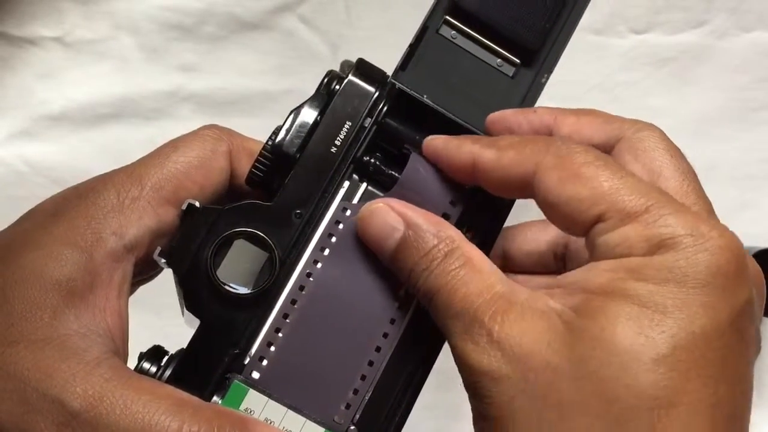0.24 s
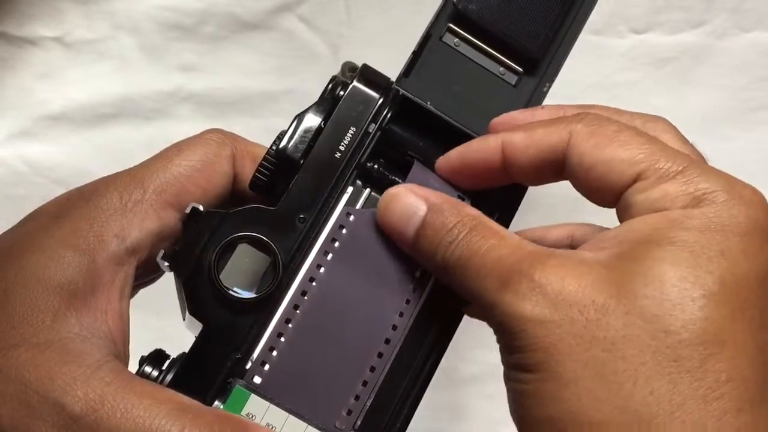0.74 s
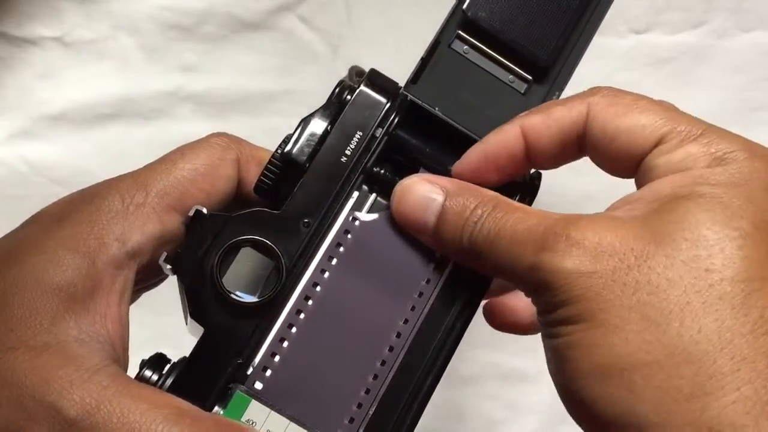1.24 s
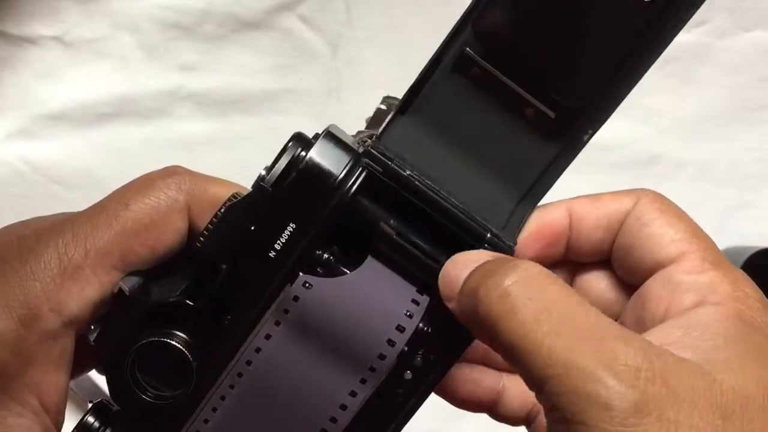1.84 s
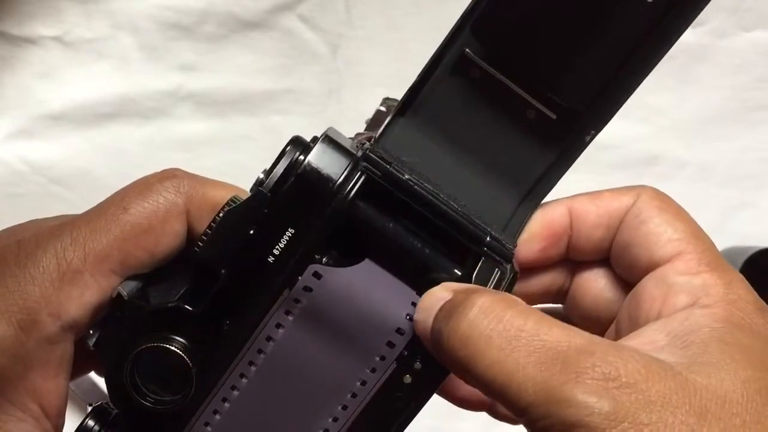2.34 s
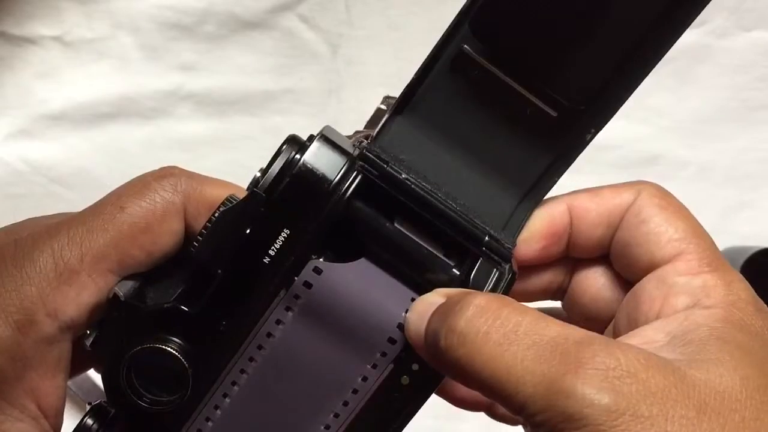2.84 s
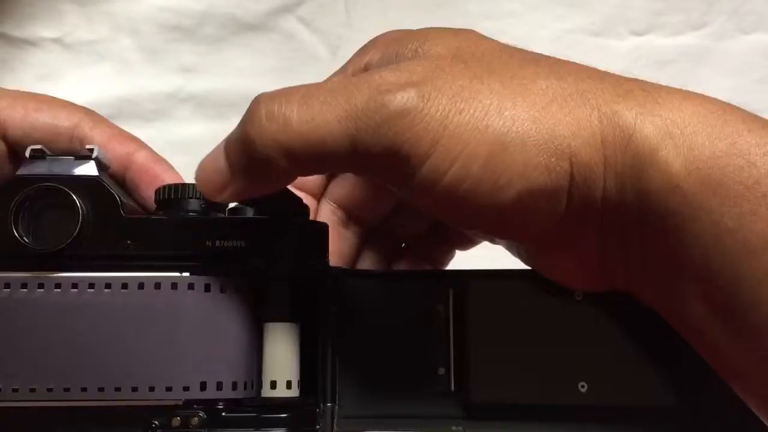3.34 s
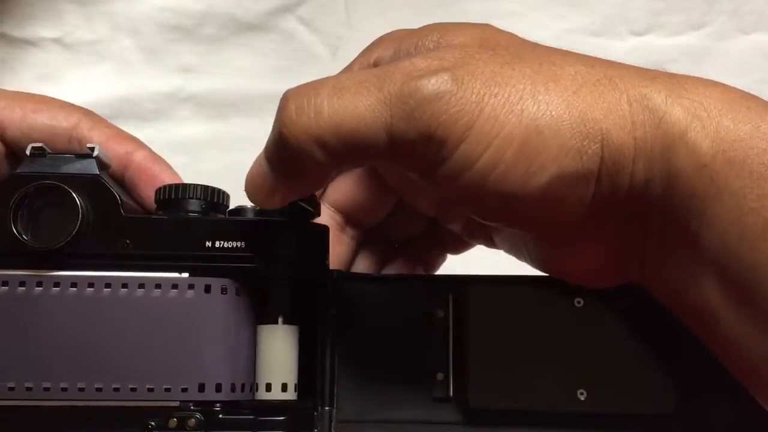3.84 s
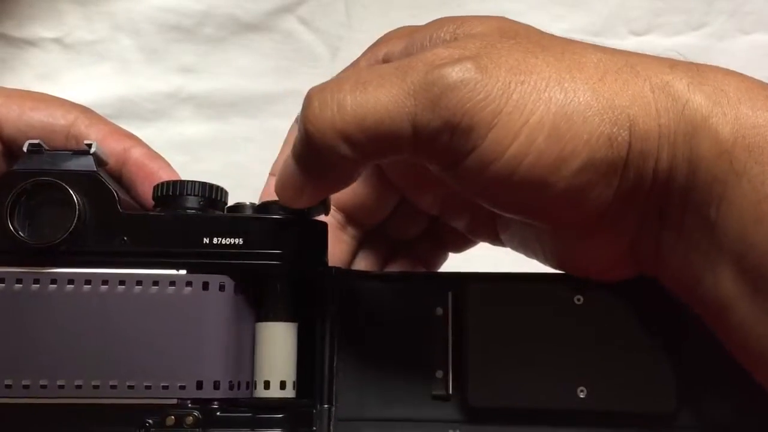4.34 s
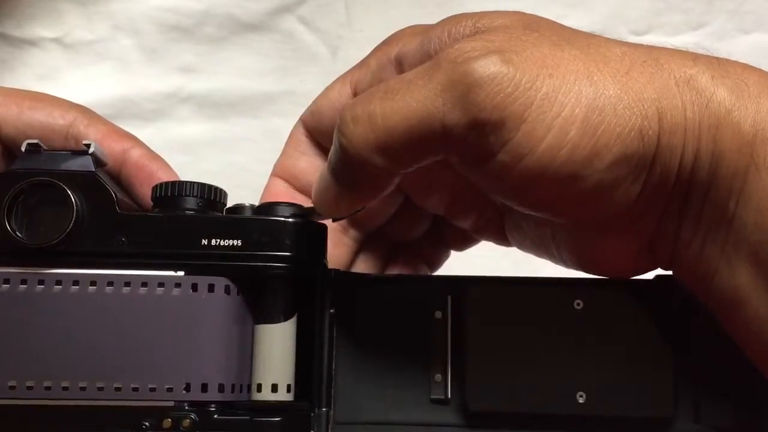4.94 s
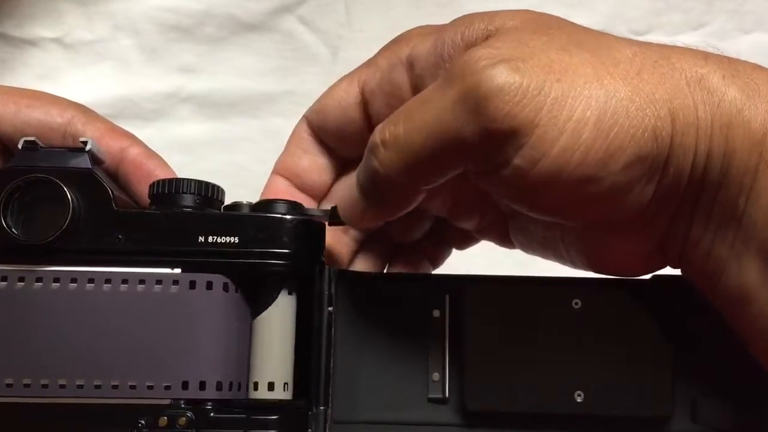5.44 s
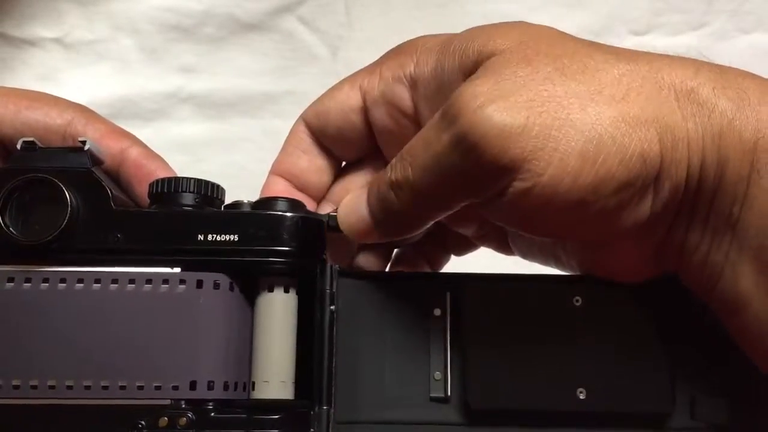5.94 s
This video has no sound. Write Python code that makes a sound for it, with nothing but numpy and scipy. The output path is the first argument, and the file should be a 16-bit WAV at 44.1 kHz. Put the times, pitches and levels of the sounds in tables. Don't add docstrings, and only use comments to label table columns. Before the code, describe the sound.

A faint low motor hum lies under a quiet indoor room. Fingers handle film with small plasticky snaps, a sharper snap and dull thuds early on, then a slight squeak. The sound cuts briefly twice. Between cuts, only a few light ticks; after the second, a loud double shutter crack, hard lever catches and increasingly crowded ratchet clicking with loose rattles, very close and dry, until it stops.

```python
import sys
import numpy as np
from scipy import signal
from scipy.fft import rfft, irfft
from scipy.io import wavfile
from scipy.ndimage import uniform_filter1d

SR = 44100
rng = np.random.default_rng(int(sys.argv[2]) if len(sys.argv) > 2 else 0)


def inscribe(sig):
    pcm = np.round(np.clip(np.atleast_2d(sig).T, -1, 1) * 32767)
    wavfile.write(sys.argv[1], SR, pcm.astype(np.int16))


def field_ratio(decibels):
    return 10 ** (np.asarray(decibels, dtype=float) / 20)


N = 273420
TIME_S = np.arange(N) / SR
FFT_HZ = np.arange(N // 2 + 1) * SR / N

# freq_hz, density_db
ROOM_SPECTRUM = [(120, -61.5), (200, -6.5), (279, -15.5), (343, 0), (398, -20), (735, -24.5), (1030, -22.5),
                 (14900, -37.5), (17000, -59.5)]
ROOM_DB = -66.5
# time_s, level_db
MOTOR_WHINE = [
    (0, -61),
    (.64, -61),
    (1.9, -62),
    (3, -62.5),
    (3.9, -58),
    (6.2, -58.5),
]
# multiple, level_db
MOTOR_ORDERS = [(3, -8), (4, -13), (5, -17.5), (7, -1), (8, -21), (9, -17.5), (11, -21.5), (12, -27)]
MOTOR_HZ = 49.3
# crest_s, level_db, fall_s
THROBS = [
    (.25, -60.5, 0.087),
    (.64, -65, 0.22),
    (1.38, -61, 0.26),
    (2.62, -56, 0.39),
    (3.3, -67.5, 0.46),
    (4.2, -64, .3),
    (4.65, -58.5, 0.54),
    (5.7, -66, .5),
]
THROB_REST_DB, THROB_RISE_S = -73, 0.12

# time_s, level_db
HAND_RUB = [(0, -74), (.2, -67), (.52, -92.5), (.6, -55), (.75, -71.5), (1, -73), (1.3, -75.5),
            (1.9, -81.5), (2.23, -67), (2.5, -82), (3.4, -88), (3.5, -72.5), (4.3, -67), (4.66, -67.5),
            (4.89, -56), (5.04, -67), (5.75, -52), (6.2, -75)]
# freq_hz, density_db
RUB_SPECTRUM = [(700, -12.5), (1600, -3), (3000, 0), (4500, -3.5), (5500, -7.5), (8000, -9), (12000, -9),
                (16000, -11.5)]
# freq_hz, density_db
HOLLOW_SPECTRUM = [(350, 2), (700, -1), (1400, -7.5), (2200, -8.5)]
# freq_hz, density_db
RUMBLE_SPECTRUM = [(45, -25), (70, 2), (110, -2.5), (155, 6), (200, -5), (300, -5.5), (500, -14)]
# crest_s, rumble_db
GRIPS = [(0, -72), (.6, -52), (.7, -56), (1.23, -68), (2.57, -58), (3.5, -64), (4.68, -56), (4.89, -65),
         (5.25, -56.5), (5.68, -69), (6.08, -63)]
GRIP_REST_DB, GRIP_RISE_S, GRIP_FALL_S = -63.5, 0.03, 0.05

# start_s, pitch_hz, peak_db
KNOCKS = [(.147, 890, -40.5), (0.584, 1000, -39), (.927, 1730, -39), (1.005, 1680, -36.5),
          (1.043, 788, -32.5), (1.093, 844, -45), (3.483, 1620, -47), (3.648, 1450, -36), (4.3, 1620, -60),
          (3.957, 548, -44.5), (4.472, 850, -47), (4.579, 720, -41.5), (2.654, 720, -52.5),
          (4.5795, 1290, -31), (4.800, 665, -43.5), (4.853, 965, -38), (5.157, 586, -48.5),
          (5.183, 470, -44.5), (5.248, 650, -54), (5.276, 730, -56), (5.308, 534, -50), (5.431, 760, -46.5),
          (5.492, 626, -48), (5.610, 622, -38.5), (5.625, 520, -43), (5.612, 1250, -40), (5.672, 720, -45),
          (5.758, 814, -35), (5.795, 533, -47), (5.861, 790, -35), (6.090, 840, -53.5)]
# start_s, pitch_hz, peak_db
THUDS = [
    (0.553, 79.4, -38.5),
    (.585, 76, -40),
    (.6, 240, -37),
    (0.635, 97.5, -36.5),
    (0.809, 123, -45),
    (1.213, 77, -42),
    (3.481, 132, -40.5),
]
# centre_s, length_s, pitch_hz, level_db
SQUEAKS = [
    (1.44, 0.097, 820, -59.5),
    (1.189, 0.041, 1200, -68),
    (1.24, 0.066, 1320, -67),
    (1.272, 0.06, 1800, -67),
    (2.253, 0.079, 1180, -62),
]
# centre_s, length_s, pitch_hz, level_db
CHAFES = [(.17, .035, 1750, -65), (.18, .06, 2500, -68), (.65, 0.13, 2005, -63), (.84, .04, 1630, -74),
          (.88, .05, 1870, -67), (.905, .04, 1750, -67), (.9, .06, 2500, -70), (1.02, 0.054, 1700, -54),
          (1.07, 0.05, 844, -63), (1.08, .03, 1950, -65), (1.23, 0.13, 536, -65.5), (4.5, .06, 1450, -61.5),
          (4.51, 0.077, 4150, -57), (4.62, 0.13, 3200, -52), (4.63, .08, 6000, -56.5),
          (4.9, .06, 5700, -53), (5.1, .04, 4200, -58), (5.29, 0.035, 4180, -59), (4.208, .035, 3500, -56),
          (1.53, .06, 3800, -71)]
SQUEAK_WIDTH, CHAFE_WIDTH = 0.045, 0.16

# crest_s, rise_s, fall_s, level_db
SCRAPES = [(.148, 0.002, 0.0066, -40.5), (0.5835, 0.00088, 0.0018, -25.5), (1.025, 0.014, 0.0071, -57),
           (1.041, 0.0054, 0.0041, -36), (2.015, 0.0046, 0.0052, -61.5), (2.207, 0.0044, 0.022, -50),
           (2.359, 0.0011, 0.034, -50), (2.581, .001, 0.026, -53.5), (2.65, .001, 0.0045, -43),
           (5.753, .001, 0.012, -35), (5.858, 0.0019, 0.006, -31)]
# freq_hz, density_db
SCRAPE_SPECTRUM = [(900, -7.5), (2000, 0.5), (6000, -0.5), (8000, -7), (10000, 0), (16000, -6.5)]

# freq_hz, width_hz, level_db
PLATE_MODES = [(2140, 91, -7.5), (2957, 110, 6), (3200, 80, 3), (3560, 170, 5), (5850, 1300, 1),
               (7300, 150, -7)]
# freq_hz, width_hz, level_db
SHUTTER_MODES = [(2880, 300, 8), (3600, 440, 0), (5400, 570, 7)]
SHUTTER_S, SHUTTER_T60_S, SHUTTER_DB = 3.957, 0.36, -43
# freq_hz, density_db
TAIL_SPECTRUM = [(700, -17.5), (1600, -3), (3000, 1), (4200, 0.5), (5000, -10.5), (8000, -11), (12000, -12),
                 (16000, -15)]
TAIL_T60_S, TAIL_DB = 0.19, -38.5
PLATE_T60_S, PLATE_DB = 0.43, -42

# start_s, peak_db, pitch_hz, t60_s
PINGS = [
    (0.5851, -30.5, 1780, 0.025),
    (3.8819, -31, 1690, 0.018),
    (3.9232, -37, 1590, 0.026),
    (4.4716, -25, 1540, 0.011),
    (5.0843, -52, 1620, 0.03),
    (5.277, -44, 1600, 0.033),
    (5.3058, -51, 1900, 0.03),
    (5.6633, -35, 1520, 0.028),
    (5.76, -33, 1590, 0.022),
    (5.866, -30, 1730, 0.026),
         (0.0014, -47, 2520, 0.02), (0.1461, -41, 2430, 0.022), (0.5814, -30, 2670, 0.018),
             (3.8806, -32, 2440, 0.022), (3.9215, -24, 2460, 0.024), (4.371, -40, 2050, 0.022),
             (4.577, -23, 2780, 0.018), (4.7964, -35, 2350, 0.022), (4.803, -37, 2460, 0.026),
             (4.8458, -27, 2080, 0.022), (4.8523, -20.5, 2480, 0.021), (4.9541, -35.5, 2380, 0.031),
             (4.9801, -44, 2530, 0.022), (5.0744, -53, 2630, 0.022), (5.1228, -53, 2180, 0.022),
             (5.1559, -24, 2390, 0.022), (5.245, -43, 1900, 0.015), (5.3073, -38, 2520, 0.022),
             (5.6787, -32, 2760, 0.022), (5.7438, -37, 2700, 0.018),
         (0.0014, -27, 5640, 0.0076), (0.5836, -29, 3870, 0.013), (3.881, -30, 4660, 0.024),
              (3.923, -24, 5270, 0.012), (3.9559, -9.5, 5330, 0.008), (3.9664, -36, 5360, 0.015),
              (4.4098, -30, 4570, 0.01), (4.4709, -15, 4230, 0.007), (4.777, -32, 4600, 0.011),
              (4.854, -23, 5200, 0.008), (5.156, -19.5, 4780, 0.011), (5.2738, -34, 4130, 0.016),
              (5.7552, -20, 4100, 0.015), (5.7595, -18, 4220, 0.015),
         (2.0981, -35, 3550, 0.011), (2.1415, -37, 4160, 0.011), (2.2099, -34, 3320, 0.0098),
              (2.2233, -21.5, 3370, 0.011), (2.2438, -37, 2890, 0.012), (2.3645, -40, 3470, 0.0089),
              (2.3905, -45, 4090, 0.012), (2.4199, -40, 3380, 0.01), (2.5895, -29, 3820, 0.01),
              (2.6529, -20, 3460, 0.01), (3.696, -35, 3380, 0.011), (3.7409, -44, 3300, 0.012),
              (3.7983, -31, 3480, 0.0092), (3.8808, -6, 3300, 0.006), (4.1734, -24.5, 3420, 0.0084),
              (4.2198, -29, 3320, 0.0084), (4.2777, -29, 3900, 0.006), (4.5779, -4, 3350, 0.006),
              (4.8449, -14.5, 3400, 0.0097), (5.0843, -41, 3360, 0.012), (5.4291, -21, 3510, 0.011),
              (5.6164, -16, 3630, 0.011), (5.8651, -14, 3410, 0.013),
         (2.2, -49, 3300, .008), (2.015, -35, 2540, 0.017), (2.085, -51, 2300, .008),
               (1.809, -50, 2400, 0.005), (.5835, -37, 1120, 0.031), (5.429, -36.5, 1590, .025),
               (5.436, -27, 3500, .012), (2.211, -46, 1240, .03), (2.364, -47, 1320, .025),
               (5.276, -35, 3080, .012), (5.617, -28, 1700, 0.023), (4.8535, -27, 2900, 0.011),
               (5.7, -23.5, 6000, 0.0062), (.9265, -48, 3100, 0.016), (5.406, -43, 1300, 0.017)]
PING_DB, PING_LATE_S, LET_GO_S = -2.5, 0.0008, 0.0003

# start_s, strength_db, hollow_db, sharpness_db
FILM_SNAPS = [(.0024, -49.5, 7, 8), (.149, -45, -1, 1.5), (.1594, -56, 3, -4), (.4259, -60, -8, -5),
              (.5841, -24.5, -11, 0), (.6412, -47, -8, -13), (.9269, -44.5, -21, 9),
              (1.0049, -44.5, -11, -19), (1.0209, -47, -5, -17), (1.0253, -43, -20, -14),
              (1.0431, -37, -5, -3), (1.3836, -60.5, 3.5, -11), (1.4195, -60.5, -18, -5),
              (2.0089, -44, -30, -25), (2.0155, -41.5, -16, -37), (2.024, -48, -1, -25),
              (2.099, -41, -20, -23), (2.1138, -51, -6, -18), (2.1424, -43.5, -14, 2), (2.2078, -53, 7, -9),
              (2.2107, -33.5, -23, -10), (2.224, -30.5, -18, -8.5), (2.2442, -44.5, -5, 4),
              (2.3604, -57, 9, -13), (2.3654, -35.5, -7, -2.5), (2.3915, -43.5, -11, 6),
              (2.4205, -37, -9.5, -0.5), (2.5822, -50, 0, 2), (2.5903, -35.5, -20, 0),
              (2.6537, -30.5, -40, -1),
              (.072, -69, -20, -8),
    (.115, -69, -20, -11),
    (.195, -64, -8, -6),
    (.345, -64, -4, -7),
    (1.265, -66, -12, -22),
    (1.298, -64, -20, -25),
    (3.9015, -48, -20, 3),
    (5.744, -45, 1, -12),
]
# freq_hz, width_hz, level_db
FILM_MODES = [(1000, 550, -8), (1780, 210, 4.5), (2820, 65, 2), (3730, 380, 16), (6450, 2300, -15),
              (14000, 6400, 15.5)]
# freq_hz, width_hz, level_db
METAL_MODES = [(1613, 210, 24.5), (2520, 53, 16.5), (3120, 77, 10.5), (3440, 885, 24.5), (4330, 520, 22.5),
               (4790, 410, 18), (5730, 1840, 8), (8910, 1500, -4), (9100, 380, -7), (11360, 550, -8),
               (12800, 870, -14)]
# start_s, strength_db, hollow_db, bright_db, top_db
CATCHES = [(3.8815, -14, -12, -0.5, -2), (3.9226, -18.5, -11, 3.5, -3.5), (3.9371, -25.5, -17, -4, -10),
           (3.9562, -18.5, -14, 1.5, 0), (4.4718, -17, -22, -8.5, -15), (4.5785, -15.5, -11, 1, -8.5),
           (4.8454, -17.5, -15, 2, -6), (4.8538, -21, -10.5, 2, -2), (5.1571, -22.5, -13.5, 5, -8),
           (5.4063, -21, -17, 2, -2.5), (5.4301, -23, -16.5, 1.5, 2), (5.435, -26.5, -11, -6, -10),
           (5.6103, -16.5, -20, -2, -7.5), (5.6166, -16, -18.5, -1, -5), (5.7527, -28.5, -22, 2, -18.5),
           (5.7575, -13, -31, -6.5, -10), (5.761, -12.5, -19.5, -5, -5.5), (5.8598, -17, -19.5, -1.5, -8),
           (5.866, -12.5, -26, -4, -8.5)]
# start_s, strength_db, sharpness_db
RATTLES = [(3.4823, -58, -8), (3.4951, -59, -14), (3.9662, -35, -4), (4.1502, -54, -12), (4.364, -45, -10),
           (4.7969, -42, -9), (4.8735, -38, 7), (4.9157, -46.5, 8), (4.9545, -41.5, -19),
           (4.9583, -40.5, 8.5), (5.0743, -56, -10), (5.1814, -41, -3), (5.2457, -44, -5),
           (5.3083, -49, -17), (5.3174, -44.5, 5.5), (5.4038, -56, 8), (5.4225, -36, -22),
           (5.4262, -34, -19), (5.4905, -40, -5), (5.5344, -35.5, 4), (5.6036, -46, -16),
           (5.6638, -32.5, -3), (5.6773, -36, -14.5), (5.8563, -34, 6), (6.1945, -52, -12)]
# start_s, strength_db, sharpness_db
GEAR_TICKS = [(3.6968, -33.5, 0.5), (3.8582, -57, -2), (3.932, -33, -10), (3.9617, -42, -6),
              (3.9746, -33.5, -8), (4.1957, -50, -9), (4.3673, -34, -4), (4.5731, -32.5, 0),
              (4.6942, -54, -8), (4.8032, -36, -3), (4.833, -34, 1), (5.0155, -45, 7.5), (5.1517, -35, -3),
              (5.2122, -42.5, 4.5), (5.2756, -34.5, 4.5), (5.3812, -32, -0.5), (5.4159, -39, -6),
              (5.4587, -41, 3), (5.5238, -36.5, 0.5), (5.5977, -45, -0.5), (5.6284, -29.5, -15),
              (5.6606, -31.5, -2), (5.6813, -32, -7), (5.75, -36, 5.5), (5.7792, -42, -17.5),
              (5.8097, -33, 0.5), (5.8227, -32, -2.5)]
# start_s, strength_db, sharpness_db
PAWL_DROPS = [(3.742, -38, -2.5), (3.7989, -29.5, -3.5), (4.1739, -30, -6), (4.2206, -33, -6),
              (4.2784, -34.5, -1), (4.4107, -36, 3), (4.468, -33.5, -2), (4.6902, -39.5, -1),
              (4.7776, -30.5, -2.5), (5.085, -36.5, 4), (5.1241, -41, 6), (5.1751, -34.5, 0.5),
              (5.437, -30.5, -2), (5.4986, -29.5, -3.5), (5.5657, -29, -3.5), (5.6188, -29, 6),
              (5.6347, -46, -14), (5.6997, -30.5, -1.5), (5.7285, -35.5, -7.5), (5.7721, -40.5, -8.5),
              (5.7912, -28, -3.5), (5.8389, -29.5, -5), (5.9833, -39, 3)]
PAWL_HOLLOW_DB, GEAR_HOLLOW_DB, RATTLE_HOLLOW_DB = -42, -17, -7
BRIGHT_PER_SHARP, TOP_PER_SHARP, BRIGHT_DB, TOP_DB = 0.97, 1.1, 0.9, -0.5
# freq_hz, width_hz, gain_db
TABLE_DIP = [(6300, 1000, -13)]

# freq_hz, width_hz, gain_db
MICROPHONE_DIPS = [(10490, 550, -9.5), (4990, 220, -2)]
# centre_s, half_length_s
SCENE_CHANGES = [
    (1.49, 0.026),
    (3.423, 0.031),
]


def coloured(points):
    hz, db = np.transpose(points)
    gain = field_ratio(np.interp(np.log(FFT_HZ + 1), np.log(hz), db, left=-80, right=-80))
    x = irfft(rfft(rng.standard_normal(N)) * gain, N)
    return x / x.std()


def walk(rate_hz):
    k = int(SR / rate_hz)
    held = np.repeat(rng.standard_normal(N // k + 1), k)
    return 1.465 * uniform_filter1d(uniform_filter1d(held, k), k)[:N]


def patchy(points, rate_hz, depth_db):
    octave = np.log2(FFT_HZ + 1)
    whole = rfft(coloured(points))
    out = np.zeros(N)
    for centre in np.arange(9.5, 14.6, 0.5):
        band = np.clip(1 - 2 * np.abs(octave - centre), 0, 1)
        out += irfft(whole * band, N) * field_ratio(depth_db * walk(rate_hz))
    return out


def resonances(hz, modes):
    return 1 + sum((-1) ** k * 1j * field_ratio(db) / (1 + 2j * (hz - f) / width)
                   for k, (f, width, db) in enumerate(modes))


def ringing(modes):
    x = irfft(rfft(rng.standard_normal(N)) * (resonances(FFT_HZ, modes) - 1), N)
    return x / x.std()


def dips(x, notches):
    gains = [1 - (1 - field_ratio(db)) / (1 + 2j * (FFT_HZ - f) / width) for f, width, db in notches]
    return irfft(rfft(x) * np.prod(gains, axis=0), N)


def level_curve(table):
    s, db = np.transpose(table)
    return np.interp(TIME_S, s, db)


def swell(crest_s, rise_s, fall_s):
    return np.exp(-np.abs(TIME_S - crest_s) / np.where(TIME_S < crest_s, rise_s, fall_s))


def add(track, start_s, sound):
    i = int(start_s * SR)
    track[max(i, 0):i + len(sound)] += sound[max(-i, 0):N - i]


def room():
    return coloured(ROOM_SPECTRUM) * field_ratio(ROOM_DB + 0.5 * walk(2.7))


def motor():
    swells = field_ratio(THROB_REST_DB) + sum(field_ratio(db) * swell(s, THROB_RISE_S, fall) for s, db, fall in THROBS)
    phase = 2 * np.pi * MOTOR_HZ * np.cumsum(1 + 0.00084 * walk(3.03)) / SR
    whine = sum(field_ratio(db + 1.9 * walk(13)) * np.sin(k * phase + 6 * rng.random()) for k, db in MOTOR_ORDERS)
    throb = np.sin(0.98 * phase + 0.33 * walk(14)) * swells * field_ratio(1.5 * walk(18))
    return np.sqrt(2) * (whine * field_ratio(level_curve(MOTOR_WHINE)) + throb)


def hands():
    rub_db = level_curve(HAND_RUB)
    grip = field_ratio(GRIP_REST_DB) + sum(field_ratio(db) * swell(s, GRIP_RISE_S, GRIP_FALL_S) for s, db in GRIPS)
    plates = sum(ringing([(hz, 2 * width, db)]) * np.sqrt(width) * field_ratio(db - 38 + 3.7 * walk(19))
                 for hz, width, db in PLATE_MODES)
    winding = TIME_S > SCENE_CHANGES[-1][0]
    grit = 0.55 * patchy(RUB_SPECTRUM, 30, depth_db=3.0) + plates * winding
    rub = grit * field_ratio(rub_db + 3.1 * walk(400) + 1.9 * walk(36))
    hollow_level = np.sqrt(field_ratio(rub_db) * grip) * field_ratio(-7.5 + np.minimum(3.8 * walk(60), 5.5))
    hollow = coloured(HOLLOW_SPECTRUM) * hollow_level
    rumble = coloured(RUMBLE_SPECTRUM) * grip * field_ratio(2.0 * walk(25) + 1.3 * walk(3.98))
    return rub + hollow + rumble


def knocks():
    out, t = np.zeros(N), TIME_S[:12000]
    for s, hz, db in KNOCKS + THUDS:
        t60_s = 0.29 * (70 / hz) ** 0.96
        pair = np.sin(2 * np.pi * hz * t) + 0.5 * np.sin(2 * np.pi * 1.26 * hz * t)
        decay = np.exp(-np.log(1000) * t / t60_s)
        add(out, s, field_ratio(db) * pair * decay * (1 - np.exp(-t * hz)))
    return out


def squeaks(rows, width):
    out, t = np.zeros(N), TIME_S[:8000] - 4000 / SR
    for s, length_s, hz, db in rows:
        k = int(SR / (width * hz))
        noise = rng.standard_normal((2, len(t)))
        shake = uniform_filter1d(uniform_filter1d(noise, k), k) * np.sqrt(k * 0.86)
        tone = shake[0] * np.sin(2 * np.pi * hz * t) + shake[1] * np.cos(2 * np.pi * hz * t)
        add(out, s + t[0], field_ratio(db) * np.exp(-2 * (2 * t / length_s) ** 2) * tone)
    return out


def stored(hits, t60_s):
    keep = np.exp(-2 * np.log(1000) / (t60_s * SR))
    return 10 * np.sqrt(signal.lfilter([1 - keep], [1, -keep], hits ** 2))


def wash(hits):
    hiss_level = field_ratio(TAIL_DB + 14 + 3.0 * walk(300)) * stored(hits, TAIL_T60_S) / 10
    hiss = hiss_level * patchy(TAIL_SPECTRUM, 70, depth_db=3.0)
    plate_level = field_ratio(PLATE_DB + 18.0 + 2.1 * walk(120)) * stored(hits, PLATE_T60_S) / 10
    plates = plate_level * ringing(PLATE_MODES)
    since_s = TIME_S - SHUTTER_S
    shutter = field_ratio(SHUTTER_DB - 60 * since_s / SHUTTER_T60_S) * (since_s > 0) * ringing(SHUTTER_MODES)
    return hiss + plates + shutter


def scrapes():
    shape = sum(field_ratio(db) * swell(s, rise, fall) for s, rise, fall, db in SCRAPES)
    return shape * coloured(SCRAPE_SPECTRUM) * field_ratio(2.0 * walk(900))


def pings():
    out, t = np.zeros(N), TIME_S[:4000]
    for s, db, hz, t60_s in PINGS:
        decay = field_ratio(db + PING_DB - 60 * t / t60_s)
        add(out, s + PING_LATE_S, decay * np.sin(2 * np.pi * hz * t) * (1 - np.exp(-t * hz)))
    return out


def shares(rows, hollow_db=None):
    return [(s, db, own[0] if own else hollow_db,
             BRIGHT_DB + BRIGHT_PER_SHARP * sharp, TOP_DB + TOP_PER_SHARP * sharp)
            for s, db, *own, sharp in rows]


def clicks(events, body, crack_s, chatter_s, chatter_db, creep_s, creep_db, detune, spike_db):
    out, lead = np.zeros(N), 512
    t, hz = TIME_S[:2048] - lead / SR, np.arange(1025) * SR / 2048
    edges_hz = np.array([1150, 2650, 6000, 10500, 16500])
    steepness = np.array([10, 14, 24, 30, 60])
    steps = 1 / (1 + (edges_hz[:, None] / (hz + 1)) ** steepness[:, None])
    bands = steps[:-1] - steps[1:]
    after = np.maximum(t, 0)
    crack = after / crack_s * np.exp(1 - after / crack_s)
    for s, db, hollow_db, bright_db, top_db in events:
        loose = rng.standard_normal(3)
        woken = np.array(body) + np.outer(2.9 * rng.standard_normal(len(body)), [0, 0, 1])
        chatter = field_ratio(chatter_db + 2.2 * loose[0]) * np.exp(-after / chatter_s) * (t > 0)
        creep_level = field_ratio(creep_db - 0.6 * (db + 30) + 2.5 * loose[1])
        creep = creep_level * np.exp(-np.abs(t) / creep_s) * (t <= 0)
        grit = rng.standard_normal(len(t)) * (crack + chatter + creep)
        shake = rfft(grit + field_ratio(spike_db) * (t == 0))
        parts = irfft(shake * resonances(hz * (1 + detune * loose[2]), woken) * bands)
        band_db = db + np.array([hollow_db, 0, bright_db, top_db])
        gains = field_ratio(band_db) * np.sqrt(SR / 1000 / (parts ** 2).sum(axis=1))
        add(out, s + LET_GO_S - lead / SR, gains @ parts)
    return out


def film_snaps():
    return clicks(shares(FILM_SNAPS), FILM_MODES, crack_s=0.00039, chatter_s=0.0021, chatter_db=0.0,
                  creep_s=0.0021, creep_db=-23.0, detune=0.084, spike_db=3.0)


def catches():
    return clicks(CATCHES, METAL_MODES, crack_s=0.00016, chatter_s=0.002, chatter_db=-10.5,
                  creep_s=0.001, creep_db=-30.0, detune=0.0066, spike_db=16.5)


def ratchet():
    ticks = shares(PAWL_DROPS, PAWL_HOLLOW_DB) + shares(GEAR_TICKS, GEAR_HOLLOW_DB)
    ticks += shares(RATTLES, RATTLE_HOLLOW_DB)
    return clicks(ticks, METAL_MODES, crack_s=0.00017, chatter_s=0.0026, chatter_db=-9.5,
                  creep_s=0.0032, creep_db=-22.0, detune=0.016, spike_db=9.5)


def scene():
    metal = dips(ratchet() + catches(), TABLE_DIP)
    hits = film_snaps() + metal + scrapes() + pings()
    rubbed = squeaks(SQUEAKS, SQUEAK_WIDTH) + squeaks(CHAFES, CHAFE_WIDTH) + hands()
    mix = room() + motor() + rubbed + knocks() + wash(hits) + hits
    return mix[None]


def roll_off(x):
    return signal.sosfilt(signal.butter(12, 17140, fs=SR, output="sos"), x)


def record(dry):
    top_cut = 1 / np.sqrt(1 + (FFT_HZ / 15800) ** 70)
    fades = np.prod([np.clip(np.abs(TIME_S - s) / half_s, 0.02, 1) for s, half_s in SCENE_CHANGES], axis=0)
    heard = irfft(rfft(dips(dry, MICROPHONE_DIPS)) * top_cut, N)
    return roll_off(heard * fades)


dry = scene()
out = record(dry)
inscribe(out)
```